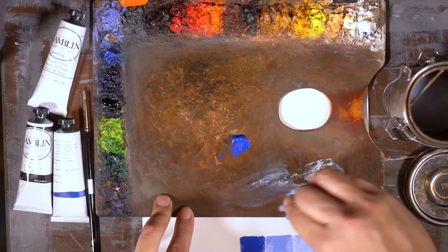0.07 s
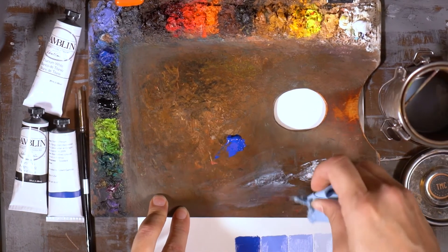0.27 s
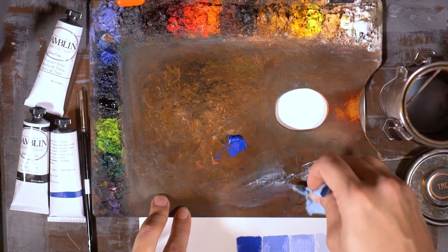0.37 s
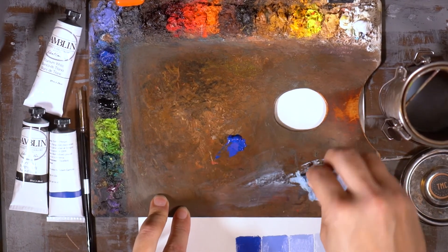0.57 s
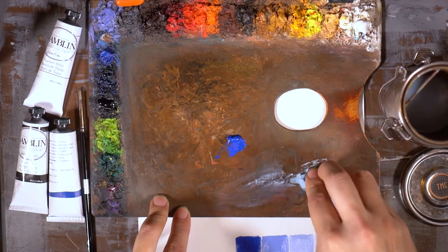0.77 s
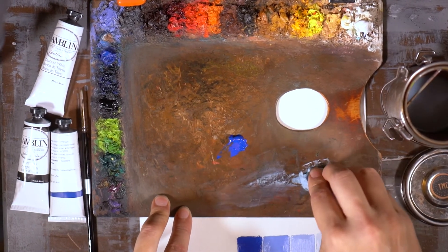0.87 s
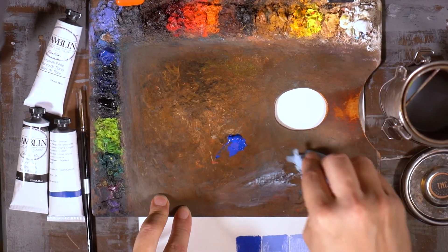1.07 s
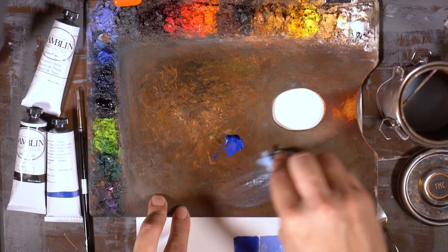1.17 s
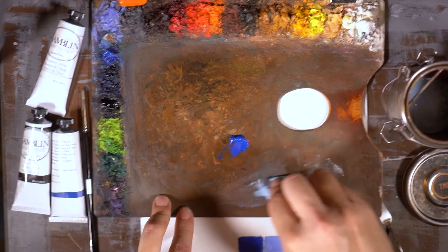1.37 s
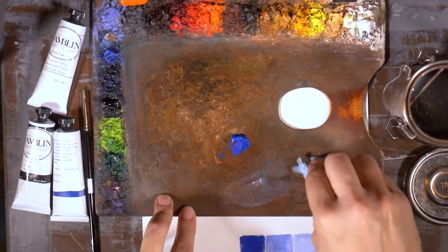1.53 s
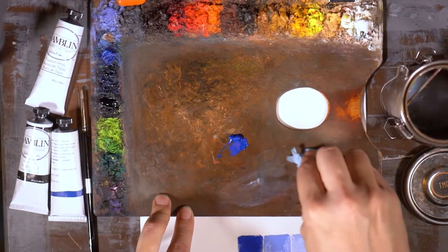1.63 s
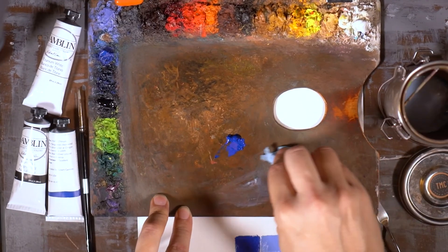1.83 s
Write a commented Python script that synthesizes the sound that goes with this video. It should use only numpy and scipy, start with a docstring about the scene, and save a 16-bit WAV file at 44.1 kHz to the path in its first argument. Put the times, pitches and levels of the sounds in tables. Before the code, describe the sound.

Soft, hissing wipes of wadded paper on wood, close by in a quiet studio. Early on the board gives one sharp, briefly ringing knock; after more gentle strokes, the paper scrubs harder in quick, scratchy scuffs.

```python
"""A soft rub of wadded paper towel wiping paint off a wooden palette, on a table in a small, quiet studio.
The palette knocks once against the table as the hand lifts: a crack, then ringing board modes.
More wipes follow, fibres slipping over wood, then a burst of crisp scuffs where the paper catches
and lets go. The pressing hand bumps the board now and then. Room air and a faint hum lie beneath."""
import sys
import numpy as np
from scipy import signal
from scipy.fft import rfft, irfft
from scipy.io import wavfile

SR = 44100
rng = np.random.default_rng(int(sys.argv[2]) if len(sys.argv) > 2 else 0)


def digitize_waveform(pressure):
    """Quantize a signal to 16-bit integers and store it at the path in sys.argv[1].

    Rows of a 2-D input are taken as channels; values are limited to [-1, 1].
    """
    field = np.atleast_2d(pressure).T
    bounded = np.clip(field, -1, 1)
    quanta = np.round(bounded * 32767).astype(np.int16)
    wavfile.write(sys.argv[1], SR, quanta)


N = 83790


def wipe():
    """Countless fibres slip over the wood, louder and brighter as the hand speeds up; the board drones."""
    strokes = [(0, -51.5, -2), (.1, -49.5, 3), (.195, -45.5, -7), (.215, -51.5, -2), (.29, -66, -2),
               (.34, -54, 0), (.365, -71, 3), (.42, -56.5, -4), (.462, -65, 6), (.48, -50.5, 0),
               (.512, -50.5, 2.5), (.56, -66, -3), (.6, -55, -7), (.63, -61.5, 8), (.70, -58.5, 4),
               (.735, -54, -6), (.79, -54.5, -2), (.83, -63, -1), (.855, -54, -11), (.91, -61, 2),
               (.965, -63, -3), (0.999, -51, -14.5), (1.11, -50, -7.5), (1.189, -42, 0), (1.26, -43, 9),
               (1.318, -50, 1.5), (1.376, -53.5, 2.5), (1.45, -47, 2), (1.53, -44, 6), (1.62, -45.5, -2),
               (1.70, -51, -3), (1.80, -53, -1), (1.82, -49.5, -3), (1.857, -44, -2.5), (1.9, -46, 6)]  # hand motion: t/s, level/dB, treble tilt/dB
    rub_spectrum = [(100, -35), (1200, -25), (2200, -14.5), (2900, -3.5), (4000, 1), (5000, 1.5),
                    (7000, -0.5), (10000, -4.5), (15500, -9)]  # fibre hiss: f/Hz, density/dB
    drone_spectrum = [(40, -17), (130, 0), (260, -1.5), (380, 0), (600, -7), (1100, -3), (1550, -7),
                      (1850, 2), (2150, -4), (2700, 3), (4000, -6.5), (16000, -39)]  # rubbed board: f/Hz, density/dB
    drone_db, drone_db_per_rub_db = -42.5, 0.31
    t = np.arange(N) / SR
    times_s, levels_db, tilts_db = np.transpose(strokes)
    rub_db = np.interp(t, times_s, levels_db)
    slips = grains(N, per_s=18000, spread_db=3)
    hiss = brighten(colour(slips, rub_spectrum, lean=True), np.interp(t, times_s, tilts_db))
    drone = colour(rng.standard_normal((2, N)), drone_spectrum)
    return early_reflections(amp(rub_db) * hiss) + amp(drone_db + drone_db_per_rub_db * rub_db) * drone


def scuffs():
    """The paper catches and lets go in a clump of snaps, with a brief hollow ring."""
    # paper catches: t/s, level/dB, attack/s, hold/s, t60/s, treble tilt/dB, ring f/Hz, ring level/dB
    catches = [(0.1925, -41, .001, 0.00088, 0.033, -24, 2900, -48),
               (0.491, -63, 0.0055, 0.016, .07, 0, 2440, -51),
               (0.726, -50.5, 0.0028, 0.0044, 0.053, -22, 2490, -56),
               (1.4594, -25.5, 0.0016, .003, 0.074, -1.5, 1890, -37),
               (1.4882, -25, 0.00053, .002, 0.057, -2.5, 1940, -47.5),
               (1.496, -31, .002, 0.0054, 0.095, 12.5, 2050, -45),
               (1.514, -57, 0.00058, 0.0039, 0.023, 4, 1137, -37.5),
               (1.53, -36.5, 0.0027, 0.0048, .06, -14, 1180, -55),
               (1.546, -34.5, 0.0035, 0.0027, 0.12, -6, 1120, -49),
               (1.554, -36.5, 0.0019, 0.0037, 0.062, -7, 2030, -45.5),
               (1.585, -32.5, 0.0075, 0.0014, 0.1, -8, 1640, -58),
               (1.639, -26.5, 0.0016, 0.0042, 0.051, 0, 1670, -45),
               (1.653, -40.5, 0.0018, 0.0066, 0.093, 9, 1180, -50.5),
               (1.71, -39.5, 0.0083, .005, .06, -7, 1650, -61),
               (1.762, -45, 0.0015, .003, .06, -7, 1700, -58)]
    snap_spectrum = [(100, -26), (600, -10.5), (1100, -9.5), (1450, -13), (2700, -10.5), (3100, -6.5),
                     (3500, 3), (4100, -4.5), (4750, 4.5), (5150, -2.5), (5600, 0), (7500, 0), (10000, -1),
                     (12500, -2.5), (15500, -2)]  # paper snaps: f/Hz, density/dB
    ring_width, blur_per_s = 0.057, 10  # a slow attack widens the ring
    snaps, rings = np.zeros((2, N)), np.zeros((2, N))
    t = np.arange(SR // 4) / SR
    for start_s, level_db, attack_s, hold_s, t60_s, tilt_db, ring_hz, ring_db in catches:
        shape = envelope(t, attack_s, hold_s, t60_s)
        clump = colour(grains(len(t), per_s=14000, spread_db=2.5), snap_spectrum, lean=True)
        ring = resonance(len(t), ring_hz, ring_width + blur_per_s * attack_s)
        add(snaps, start_s, amp(level_db) * shape * brighten(clump, tilt_db))
        add(rings, start_s, amp(ring_db) * shape * ring)
    return early_reflections(snaps) + rings


def knocks():
    """The palette strikes the table and rebounds: a crack, and modes that ring on."""
    blows = [(0.2226, -19, -24), (0.2468, -25.5, -44)]  # blow and rebound: t/s, crack level/dB, ring level/dB
    modes = [(116.4, -26.5, 0.46), (175.4, -16, 0.21), (287, -13.5, 0.12), (343, -7.5, .13),
             (620, -6, 0.23), (690, -10, 0.27), (837, -16, 0.26), (959, -1.5, 0.13), (1017, 0.5, 0.042),
             (1105, -11.5, 0.21), (1305, -5, 0.13), (1448, -2, 0.086), (2028, -13, 0.13), (2272, -2, 0.15),
             (2388, -7, 0.12), (2490, 2, 0.061)]  # palette modes: f/Hz, level/dB, t60/s
    crack_spectrum = [(40, -25), (130, -29), (240, -19), (330, -9), (480, -11.5), (620, -4.5), (770, -7),
                      (1000, -1), (1400, -5), (1700, -8), (2000, -1), (2450, -1.5), (3100, -10),
                      (5500, -19), (8000, -26.5), (16000, -42)]  # many short-lived modes: f/Hz, density/dB
    contact_s, stereo_rad_per_khz, room_db = 0.00037, 0.19, -4
    cracks, rings = np.zeros((2, N)), np.zeros((2, N))
    t = np.arange(SR // 2) / SR
    modes_khz = np.array(modes)[:, 0] / 1000
    centre_rad = rng.uniform(0, 2 * np.pi, len(modes))
    offset_rad = stereo_rad_per_khz * modes_khz * rng.choice([-.5, .5], len(modes))
    phase_rad = np.array([centre_rad + offset_rad, centre_rad - offset_rad])
    ring = np.zeros((2, len(t)))
    for k, (hz, level_db, t60_s) in enumerate(modes):
        tone = np.sin(2 * np.pi * hz * t + phase_rad[:, k:k + 1])
        ring += amp(level_db) * envelope(t, contact_s, 0, t60_s) * tone
    crack_shape = envelope(t, attack_s=0.0003, hold_s=0.0046, t60_s=0.058)
    for start_s, crack_db, ring_db in blows:
        add(cracks, start_s, amp(crack_db) * crack_shape * rng.choice([-1., 1.], (2, len(t))))
        add(rings, start_s, amp(ring_db) * ring)
    cracks = colour(cracks, crack_spectrum)
    return cracks + rings + amp(room_db) * room(cracks)


def bumps():
    """The padded hand stirs only the low modes of board and table."""
    presses = [(0.199, -64, -12), (0.481, -57, -1), (0.846, -46, 1), (0.98, -64, 10.5), (0.998, -61.5, 9.5),
               (1.237, -51, -21), (1.462, -49, -11), (1.511, -47, -7), (1.528, -40, -9), (1.64, -61.5, 9),
               (1.685, -51.5, -12)]  # hand bumps: t/s, level/dB, relative level of upper modes/dB
    modes = [(162, -0.5, 0.092), (293, 0.5, 0.087), (382, -1, .11)]  # low modes: f/Hz, level/dB, t60/s
    attack_s = 0.0022
    out = np.zeros((2, N))
    t = np.arange(SR // 4) / SR
    lowest, *upper = [amp(level_db) * np.sin(2 * np.pi * hz * t) * envelope(t, attack_s, 0, t60_s)
                      for hz, level_db, t60_s in modes]
    for start_s, level_db, upper_db in presses:
        add(out, start_s, amp(level_db) * (lowest + amp(upper_db) * sum(upper)))
    return out


def early_reflections(x):
    """Echoes off the table and nearby things comb each channel differently."""
    echoes = [(.0007, .0011, -17.5), (.0023, 0.0015, -16), (.0038, 0.0057, -13.5)]  # short paths: left delay/s, right delay/s, level/dB
    hz = np.fft.rfftfreq(2 * N, 1 / SR)
    gains = amp(np.array(echoes)[:, 2])
    comb = 1 + sum(gain * np.exp(-2j * np.pi * hz * np.array([[left_s], [right_s]]))
                   for (left_s, right_s, _), gain in zip(echoes, gains))
    return irfft(rfft(x, 2 * N) * comb)[:, :N] / np.sqrt(1 + np.sum(gains ** 2))


def room(x, delay_s=0.005):
    """Dense reflections of the left channel, each band dying at its own rate."""
    decay = [(100, 0.15), (400, 0.37), (1100, 0.32), (2500, 0.17), (6000, 0.12), (16000, 0.15)]  # room decay: f/Hz, t60/s
    noise = colour(rng.standard_normal((2, SR // 2)), [(20, 0), (20000, 0)])
    hz, t, bands = signal.stft(noise, SR, nperseg=256)
    _, tail = signal.istft(bands * amp(-60 * t / read(decay, hz)[:, None]), SR, nperseg=256)
    out = np.zeros((2, N))
    add(out, delay_s, signal.fftconvolve(x[:1], tail / np.linalg.norm(tail[0]), axes=1))
    return out


def background():
    """Steady room air with a faint low hum."""
    air_spectrum = [(12, -33), (20, -14.5), (81, -1), (150, -4), (446, -5), (558, -5.5), (759, -8),
                    (1570, -8.5), (2600, -12.5), (3340, -18), (5850, -24), (14700, -23), (16000, -21)]  # room air: f/Hz, density/dB
    air_db, hum_hz, hum_db = -55.5, 58.5, -65
    hum = np.sin(2 * np.pi * (hum_hz * np.arange(N) / SR + rng.random()))
    air = colour(rng.standard_normal((2, N)), air_spectrum)
    return amp(air_db) * air + amp(hum_db) * hum


def grains(size, per_s, spread_db):
    """Random clicks of uneven strength, two channels."""
    strength = amp(spread_db * np.minimum(rng.exponential(1, (2, size)), 4))
    sign = rng.choice([-1., 1.], (2, size))
    fires = rng.random((2, size)) < per_s / SR
    return unit(strength * sign * fires)


def resonance(size, centre_hz, relative_width):
    """Noise through one resonance."""
    hz = np.fft.rfftfreq(size, 1 / SR)
    band = 1 / (1 + ((hz - centre_hz) / (relative_width * centre_hz)) ** 2)
    return unit(irfft(rfft(rng.standard_normal(size)) * band, size))


def colour(x, spectrum, lean=False):
    """Shapes two unrelated signals into a stereo pair; lean tips most bands to the left."""
    stereo_width = [(60, -21), (130, -12.5), (300, -9.5), (600, -4), (1300, -4.5), (2600, -3.5), (6000, -4),
                    (10000, -0.5), (15000, 1.5)]  # side over mid: f/Hz, level/dB
    balance = [(200, 6), (1900, 4), (3800, 2), (6000, 1), (8000, -2.5), (10000, 0.5), (13000, 3),
               (16000, 1.5)]  # left over right: f/Hz, level/dB
    size = x.shape[1]
    hz = np.fft.rfftfreq(size, 1 / SR)
    mid, side = rfft(x)
    width = amp(read(stereo_width, hz))
    left = amp(read(balance, hz) / 2) if lean else 1
    pair = np.array([(mid + width * side) * left, (mid - width * side) / left]) / np.sqrt(1 + width ** 2)
    gain = unit(amp(read(spectrum, hz)))
    return irfft(pair * minimum_phase(gain, size), size)


def brighten(x, tilt_db, pivot_hz=4630):
    """Tilts the bands above and below the pivot against each other."""
    size = x.shape[1]
    octave = np.log2(np.fft.rfftfreq(size, 1 / SR) / pivot_hz + 1e-6).clip(-1, 1)
    low, mid, high = [irfft(rfft(x) * np.maximum(1 - abs(octave - k), 0), size) for k in (-1, 0, 1)]
    return amp(-tilt_db / 2) * low + mid + amp(tilt_db / 2) * high


def minimum_phase(gain, size):
    """Adds the phase that makes a filter ring after a click, never before."""
    mirrored = np.r_[gain, gain[size - len(gain):0:-1]]
    phase_rad = -signal.hilbert(np.log(mirrored)).imag[:len(gain)]
    return gain * np.exp(1j * phase_rad)


def envelope(t, attack_s, hold_s, t60_s):
    """Linear rise, hold, exponential release."""
    return np.minimum(t / attack_s, 1) * amp(-60 * np.maximum(t - attack_s - hold_s, 0) / t60_s)


def amp(db):
    """Decibels to gain."""
    return 10 ** (np.asarray(db) / 20)


def unit(x):
    """Scales to rms 1."""
    return x / np.sqrt(np.mean(x ** 2) + 1e-20)


def read(points, hz):
    """Interpolates a table over log frequency."""
    points_hz, values = np.transpose(points)
    return np.interp(np.log(hz + 1), np.log(points_hz), values)


def add(mix, start_s, sound):
    """Mixes a sound in place."""
    part = mix[:, round(start_s * SR):][:, :sound.shape[-1]]
    part += sound[..., :part.shape[1]]


def scene():
    """Paper, palette and room together."""
    room_db = -9.5
    paper = wipe() + scuffs()
    return paper + amp(room_db) * room(paper) + knocks() + bumps() + background()


def record(dry):
    """Steep low-pass band limit."""
    edge_hz = 15950
    lowpass = signal.firwin(511, edge_hz, window=("kaiser", 9), fs=SR)
    return signal.oaconvolve(dry, lowpass[None], "same")


dry = scene()
out = record(dry)
digitize_waveform(out)
```